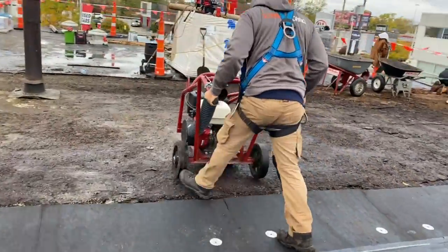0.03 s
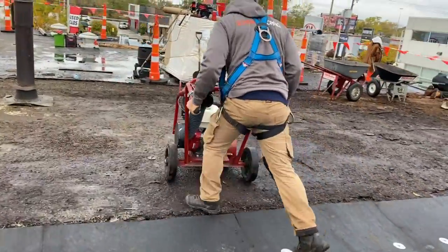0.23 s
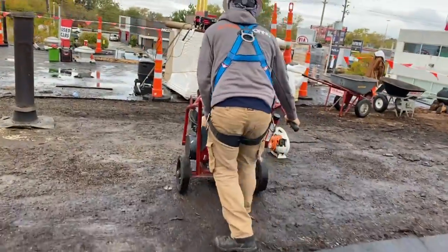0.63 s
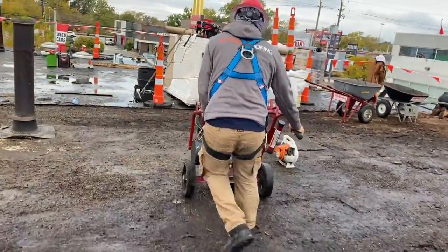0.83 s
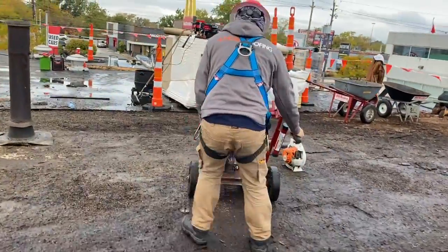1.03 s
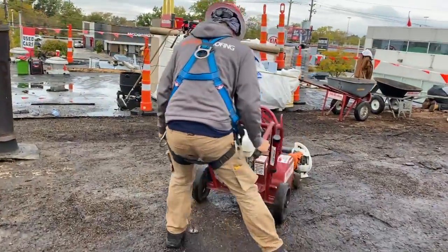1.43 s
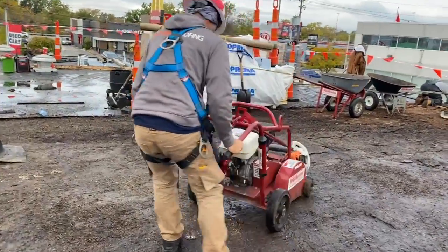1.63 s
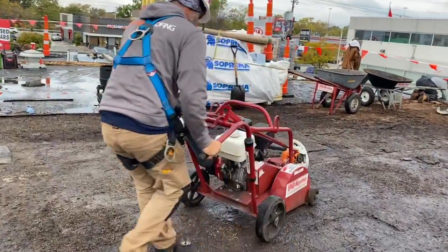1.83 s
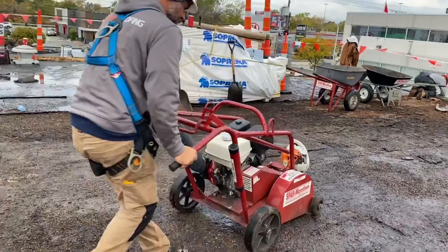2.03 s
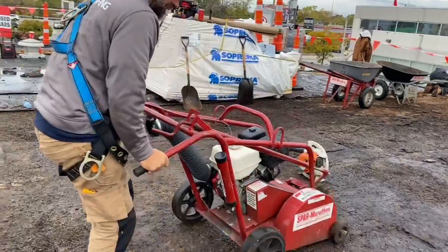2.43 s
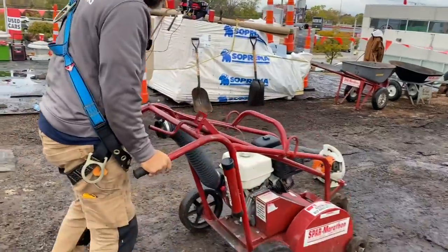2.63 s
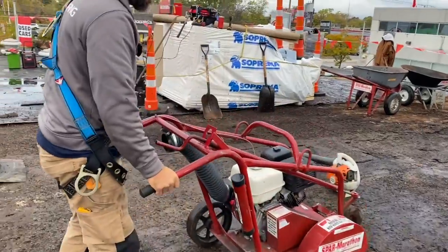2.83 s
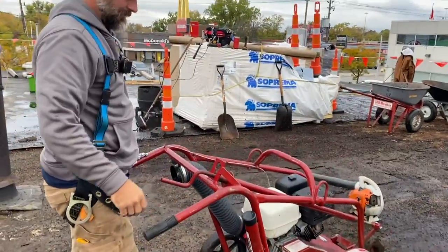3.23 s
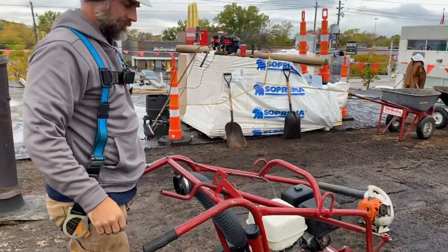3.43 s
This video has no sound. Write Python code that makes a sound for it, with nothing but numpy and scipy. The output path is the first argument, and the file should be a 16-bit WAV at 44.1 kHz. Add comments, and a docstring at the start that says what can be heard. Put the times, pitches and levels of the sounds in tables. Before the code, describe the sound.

A wheeled steel machine rolls over a gritty roof, tyres drumming, stones crunching and loose parts clattering. The knocks grow louder and sharper from about 1 second. Around 2.5 seconds it is set down with a clank and its tube frame rings briefly. Boots scuff at about 2.7 and 3.2 seconds, among dull thumps. Wind rumbles on the close microphone throughout, over a faint distant town.

```python
"""Roof cutter wheeled over grit

A steel roof cutter, engine off, rolls over a gritty roof: stones crunch, the tyres drum through the hood and
loose parts clatter at every bump. It is set down with a clank that leaves the tube frame ringing, and grit
scrapes as it settles. Wind rumbles on the close microphone over a distant town."""
import sys
import numpy as np
from scipy import signal
from scipy.fft import rfft, irfft, next_fast_len
from scipy.io import wavfile
from scipy.ndimage import map_coordinates

SR = 44100
rng = np.random.default_rng(int(sys.argv[2]) if len(sys.argv) > 2 else 0)


def digitize_waveform(pressure):
    """Quantize a signal to 16-bit integers and store it at the path in sys.argv[1].

    Rows of a 2-D input are taken as channels; values are limited to [-1, 1].
    """
    field = np.atleast_2d(pressure).T
    bounded = np.clip(field, -1, 1)
    quanta = np.round(bounded * 32767).astype(np.int16)
    wavfile.write(sys.argv[1], SR, quanta)


N = 154350


def amp(db):
    return 10 ** (np.asarray(db) / 20)

def unit(x):
    return x / np.sqrt(np.mean(x ** 2) + 1e-20)

def along(points, hz):
    """Interpolate (Hz, value) points on a log axis."""
    f, v = np.transpose(points)
    return np.interp(np.log(hz + 1), np.log(f + 1), v)

def around(hz, centre_hz, octaves):
    """Bell-shaped gain on a log axis."""
    return np.exp(-.5 * (np.log2((hz + 1) / centre_hz) / octaves) ** 2)

def curve(rows):
    """One value per sample from (s, value) rows."""
    return np.interp(np.arange(N) / SR, *np.transpose(rows))

def swell(centre_s, sigma_s):
    return np.exp(-.5 * ((np.arange(N) / SR - centre_s) / sigma_s) ** 2)

def wobble(rate):
    """Smooth random curve, rate knots a second."""
    return map_coordinates(rng.standard_normal(int(N * rate / SR) + 4), [np.arange(N) * rate / SR])

def filtered(x, response):
    n = x.shape[-1]
    padded = next_fast_len(n + 8192)
    return irfft(rfft(x, padded) * response(np.fft.rfftfreq(padded, 1 / SR)), padded)[..., :n]

def colour(spectrum):
    return lambda hz: amp(along(spectrum, hz))

def resonances(table):
    """Response of (Hz, width Hz, dB) band-passes of alternating sign."""
    return lambda f: sum((-1) ** k * amp(db) * 1j * f * width / (hz * hz - f * f + 1j * f * width)
                         for k, (hz, width, db) in enumerate(table))

def noise(spectrum):
    """Two independent coloured noises, rms 1: direct and diffuse."""
    return unit(filtered(rng.standard_normal((2, N)), colour(spectrum)))

def impacts(per_s, skew_db, response):
    """Tiny random impacts through a response, rms 1; skew_db makes a few larger (+) or smaller (-)."""
    size = amp(skew_db * np.minimum(rng.exponential(size=N), 5))
    hits = (rng.random(N) < per_s / SR) * size * rng.standard_normal((2, N))
    return unit(filtered(hits, response))

def ring(modes, t, scatter_db):
    """Damped modes, with new strengths and phases at each strike."""
    hz, db, t60 = np.transpose(modes)
    waves = np.exp((2j * np.pi * hz - np.log(1000) / t60)[:, None] * t) * (1 - np.exp(-t / 0.002))
    def strike(share=1):
        gain = share * amp(db + scatter_db * rng.standard_normal((2, len(hz))))
        phase = np.exp(2j * np.pi * rng.random((2, len(hz))))
        return ((gain * phase) @ waves).real
    return strike

def add(out, s, sound):
    i = max(0, round(s * SR))
    out[:, i:i + sound.shape[-1]] += sound[..., :N - i]


# town wash (frequency [Hz], density [dB])
TOWN_SPECTRUM = [(88, -83), (150, -10.5), (189, -9.5), (535, -23.5), (1030, -22.5), (1110, -25),
                 (2360, -30.5), (2650, -37), (4810, -61), (14200, -79), (15000, -70)]
# hiss (time [s], level [dB])
HISS_LEVEL = [(0, -62), (.3, -55.5), (2.8, -55.5), (3.06, -52), (3.16, -65.5), (3.32, -64.5), (3.5, -57)]
# hiss (frequency [Hz], density [dB])
HISS_SPECTRUM = [(1500, -17), (3500, -4.5), (4500, 3), (5500, -7), (6600, -6), (8000, -12), (11500, -8.5),
                 (16000, -15)]

def town():
    """Steady wash of a distant town, with a thin hiss."""
    return amp(-43.5) * noise(TOWN_SPECTRUM) + amp(curve(HISS_LEVEL)) * noise(HISS_SPECTRUM)


# gusts (time [s], level [dB])
WIND_LEVEL = [(0, -28.5), (.08, -39.5), (.2, -29), (.45, -33), (.7, -33.5), (1, -23.5), (1.2, -31),
              (1.45, -26.5), (1.8, -32.5), (1.95, -26.5), (2.15, -35.5), (2.35, -24.5), (2.57, -26),
              (2.73, -43), (2.82, -23.5), (2.95, -22.5), (3.15, -23), (3.38, -30.5), (3.46, -36)]
# rumble (frequency [Hz], density [dB])
WIND_SPECTRUM = [(20, -28), (35, -16.5), (50, -3), (66, -1), (100, -4), (150, -11.5), (250, -18.5),
                 (400, -35.5), (800, -38), (3000, -90)]

def wind(buffet_db=2.2, buffets_per_s=24):
    """Gusts buffet the microphone."""
    return amp(curve(WIND_LEVEL) + buffet_db * wobble(buffets_per_s)) * noise(WIND_SPECTRUM)


# dull bumps (time [s], level [dB], pitch [Hz])
THUMPS = [(.108, -18, 110), (1.058, -10, 85), (1.356, -12, 62), (2.322, -18, 150), (2.341, -14, 130),
          (2.806, -17, 110), (2.885, -15, 70), (2.936, -17, 125), (3.146, -9.5, 135), (3.472, -29, 140)]

def thumps(t60_s=.11, slap_db=1, highpass_hz=43.7):
    """Bumps close to the microphone: a few low cycles under a soft slap."""
    out, t = np.zeros((2, N)), np.arange(SR // 4) / SR
    attack = 1 - np.exp(-(t / 0.0025) ** 2)
    for s, db, hz in THUMPS:
        boom = np.sin(2 * np.pi * hz * t) * np.exp(-np.log(1000) * t / t60_s)
        slap = np.sin(2 * np.pi * 2.18 * hz * t) * np.exp(-t / 0.0058)
        add(out[:1], s, amp(db) * (boom + amp(slap_db) * slap) * attack)  # direct part only
    return filtered(out, lambda f: (1j * f / (highpass_hz + 1j * f)) ** 2)


# grit scrapes (centre [s], sigma [s], level [dB])
SCUFFS = [(2.753, 0.097, -41), (3.226, 0.017, -44)]
# scraped grit (frequency [Hz], density [dB])
SCUFF_SPECTRUM = [(300, -21), (900, 9), (1400, 7), (2400, -11), (3300, -7), (8000, -27), (16000, -30)]

def scrapes():
    """Grit scrapes in short swells: a long one as the machine settles, a brief one later."""
    scrape = impacts(per_s=3100, skew_db=1, response=colour(SCUFF_SPECTRUM))
    return scrape * sum(amp(db) * swell(s, sigma_s) for s, sigma_s, db in SCUFFS)


# breaking stones (time [s], level [dB], centre [Hz])
STONE_CRACKS = [(0.6576, -33, 4840), (1.0335, -38, 4500), (1.4414, -34, 5500), (1.7863, -29, 5000),
                (2.002, -23.5, 5900), (2.131, -40, 12100), (2.1784, -25, 5400), (2.3047, -44, 12000),
                (2.4365, -28, 4800), (2.462, -28, 4440), (2.494, -25, 4300)]

def cracks(width_octaves=0.4, decay_s=0.0035):
    """Larger stones break under a wheel with a dry click."""
    out, t = np.zeros((2, N)), np.arange(SR // 20) / SR
    for s, db, hz in STONE_CRACKS:
        burst = unit(filtered(rng.standard_normal((2, len(t))), lambda f: around(f, hz, width_octaves)))
        add(out, s, amp(db) * burst * np.exp(-t / decay_s))
    return out


# grit under the tyres (time [s], relative level [dB])
GRIT_LEVEL = [(0.0, -48), (0.1, -48.5), (0.22, -37), (0.58, -43), (0.78, -37), (1.2, -36), (1.43, -38.5),
              (1.64, -37.5), (2.08, -31.5), (2.23, -37.5), (2.46, -40.5), (2.6, -31.5), (2.87, -47.5),
              (2.95, -61)]
# fine grains (frequency [Hz], density [dB])
CRUNCH_SPECTRUM = [(200, -47), (500, 9.5), (1000, 9), (2000, 2), (4000, -8.5), (8000, -20.5),
                   (12000, -43.5), (16000, -64)]
# small stones (frequency [Hz], density [dB])
SNAP_SPECTRUM = [(500, -33), (1500, 6), (4000, -1.5), (8000, 1.5), (12000, -7), (16000, -21)]

def grit(snaps_per_s=40, snap_db=-12.5, snap_spread_db=12, snap_decay_s=0.004):
    """Fine grains crunch under the tyres; small stones snap in broad bursts."""
    crunch = impacts(per_s=1700, skew_db=-1.5, response=colour(CRUNCH_SPECTRUM))
    hits = (rng.random(N) < snaps_per_s / SR) * amp(snap_spread_db * rng.random(N))
    bursts = signal.lfilter([1], [1, -np.exp(-1 / (snap_decay_s * SR))], hits)
    snaps = unit(bursts * noise(SNAP_SPECTRUM))
    level_db = curve(GRIT_LEVEL) - 1 + 2.2 * wobble(30.15)
    return amp(level_db) * (crunch + amp(snap_db) * snaps)


def drumming(modes, waver_db=2.3, wander_widths=0.7):
    """Resonances kept ringing by the wheels, each wavering in level and pitch."""
    out = np.zeros((2, N))
    for hz, width, db in modes:
        drift = np.sqrt(2 * np.pi * wander_widths * width / SR) * rng.standard_normal((2, N))
        phase = np.cumsum(2 * np.pi * hz / SR + drift, axis=1)
        out += amp(db + waver_db * wobble(2 * width)) * np.sin(phase)
    return unit(out)


# relative rolling levels (time [s], chassis [dB], tyres [dB], hood [dB])
ROLL_LEVELS = [(0.0, -39, -26, -23), (0.075, -41, -48, -41), (0.12, -31, -20.5, -30), (0.15, -56, -35, -32),
               (0.21, -36, -28.5, -24.5), (0.44, -28, -36.5, -36), (0.57, -38.5, -31.5, -30.5),
               (0.59, -30.5, -23, -26), (0.82, -27, -32.5, -39), (0.89, -42.5, -39, -36.5),
               (1.08, -26, -18.5, -17), (1.125, -21, -23, -22.5), (1.165, -22, -15, -20),
               (1.26, -26, -38.5, -33.5), (1.34, -43, -33.5, -39.5), (1.41, -31, -33, -32),
               (1.49, -30, -19, -27), (1.55, -24, -28.5, -20), (1.66, -19, -23, -32.5),
               (1.75, -33.5, -31, -25), (1.85, -32, -22, -33), (1.93, -36, -34, -41.5),
               (2.03, -22, -16.5, -25.5), (2.12, -29.5, -30.5, -35), (2.22, -22.5, -18, -27),
               (2.29, -39, -41, -39), (2.34, -23, -26, -34), (2.39, -46, -34, -42), (2.43, -33, -28, -29),
               (2.86, -39, -39.5, -52), (2.9, -42.5, -48, -51)]
# resonances driven by rolling (frequency [Hz], width [Hz], gain [dB])
CHASSIS_MODES = [(172.9, 8.6, 0)]
TYRE_MODES = [(239, 12, 0), (252, 14, -5), (288, 20, -7), (312, 20, -10)]
HOOD_DRONE_MODES = [(378, 14.4, -6), (469, 18.7, 1.5), (509.5, 21, -2.5), (592, 24.3, -3.5),
                    (808, 13, -11.5)]

def rolling(chassis_db=1, tyre_db=0.5, hood_db=-2):
    """Stones under the wheels drum through chassis, tyres and hood, fading with the grit at the end."""
    chassis, tyre, hood = (curve(np.array(ROLL_LEVELS)[:, [0, column]]) for column in (1, 2, 3))
    boom = amp(chassis + chassis_db) * drumming(CHASSIS_MODES)
    drum = amp(tyre + tyre_db) * drumming(TYRE_MODES)
    drone = amp(hood + hood_db) * impacts(per_s=300, skew_db=0.5, response=resonances(HOOD_DRONE_MODES))
    fade = curve([(2.75, 0.86), (2.95, 0.22)])
    return fade * (boom + drum + drone + grit())


# frame resonances (frequency [Hz], width [Hz], gain [dB])
CREAK_MODES = [(1118, 32, 5), (1425, 42, 6.5), (1630, 33, 5), (2160, 105, 1), (2560, 170, -7.5)]

def creak():
    """Quick slips in a joint drive the frame as it settles."""
    slips = impacts(per_s=1300, skew_db=2.0, response=resonances(CREAK_MODES))
    return amp(-24) * swell(centre_s=2.741, sigma_s=0.011) * slips


# tube frame (frequency [Hz], gain [dB], t60 [s])
TUBE_MODES = [(463, -1, .4), (590, -1, .85), (802, 3.5, .45), (903, 1.5, .55), (955, -4, .4),
              (1098, -6, .6), (1128, -1, .85), (1273, -1, .45), (1416, -4, .7), (1470, -3, .6),
              (1561, -7, .85), (1653, -5, 1), (1846, -12, .85), (2008, -5, .5), (2135, -5, .5),
              (2654, -4, .35), (2869, -8, .4)]
# touch, land, settle (time [s], level [dB])
LANDINGS = [(2.418, -34), (2.558, -28.5), (2.71, -41)]

def landing():
    """The tube frame rings on after the machine is set down."""
    out, strike = np.zeros((2, N)), ring(TUBE_MODES, np.arange(SR) / SR, scatter_db=4)
    for s, db in LANDINGS:
        add(out, s, amp(db) * strike())
    return out


# sheet steel of the hood (frequency [Hz], gain [dB], t60 [s])
HOOD_MODES = [(800, -5, .25), (907, -5, .25), (1127, -6, .25), (1190, -7, .25), (1303, -6, .2),
              (1484, -3, .24), (1553, -10, .2), (1813, -10, .2), (2010, -6, .22), (2060, 1, .22),
              (2143, -4, .18), (2304, -7, .2), (2607, -5, .14), (2807, -2, .16), (2945, -6, .14),
              (3085, -7, .14), (3255, -3, .12), (3373, -5, .16), (3921, -6, .11), (4690, -11, .1),
              (5420, -8, .09), (6400, -11, .09)]
# hard knocks (time [s], level [dB], centre [Hz])
CLANGS = [(1.066, -18.5, 3140), (1.072, -19.5, 2080), (1.521, -17, 2750), (1.748, -21.5, 2060),
          (1.814, -31, 2050), (1.815, -20.5, 1450), (1.893, -30.5, 2050), (1.96, -25.5, 2030),
          (2.416, -20, 2230), (2.496, -28.5, 2120)]

def clangs(width_octaves=0.11):
    """Where a hard knock lands decides which modes of the hood sing out."""
    out, strike = np.zeros((2, N)), ring(HOOD_MODES, np.arange(SR // 2) / SR, scatter_db=2)
    mode_hz = np.array(HOOD_MODES)[:, 0]
    for s, db, hz in CLANGS:
        add(out, s, amp(db) * strike(around(mode_hz, hz, width_octaves)))
    return out


# loose steel (frequency [Hz], density [dB])
STEEL_SPECTRUM = [(100, -26), (170, -2), (260, 4), (400, 2), (600, 5), (1100, 5.5), (1700, 2), (2200, 2),
                  (3500, 2), (5500, -0.5), (8000, -5), (12000, -12), (16000, -25)]

def steel_bands(centres_hz, spacing_hz=20, depth_db=3.2):
    """Noise with the crowded peaks and dips of loose steel, split into bands."""
    smooth = noise(STEEL_SPECTRUM)
    peaks_db = depth_db * np.clip(rng.standard_normal(4096), -2, 2)
    peaks_hz = spacing_hz * np.arange(len(peaks_db))
    steel = unit(filtered(smooth, lambda hz: amp(np.interp(hz, peaks_hz, peaks_db))))
    return np.array([filtered(steel, lambda hz: np.interp(np.log(hz + 1), np.log(centres_hz), band))
                     for band in np.eye(len(centres_hz))])


# bumps (time [s], strength [dB], bass offset [dB], treble offset [dB])
KNOCKS = [(0.0874, -18, 12, -32), (0.153, -23, 6, -25), (0.192, -18, 12.5, -9), (0.2354, -17, 3, -44),
          (0.358, -27, 13, -9.5), (0.5, -32.5, 21, -33), (0.5716, -18.5, 8.5, -11),
          (0.5854, -15.5, 8.5, -20), (0.6595, -19, 9.5, -5.5), (0.7054, -21, 13, -13),
          (0.7727, -22.5, 14.5, -14), (0.929, -23.5, 15.5, -20), (0.9896, -17.5, 2, -18),
          (1.0211, -18.5, 10, -7.5), (1.061, -7.5, -1, -9), (1.0774, -21, -4, -28), (1.1404, -9, -22, -11),
          (1.1617, -16.5, 15, -9), (1.2835, -21.5, 7, -34), (1.3886, -16.5, -13, -22),
          (1.4318, -20, 11.5, -15.5), (1.4612, -16.5, 12, -12.5), (1.5182, -4.5, -12, -9.5),
          (1.546, -17, 17, -7), (1.6364, -10.5, 0, -9.5), (1.6594, -10, 6.5, -16.5), (1.7465, -9.5, 3, -7),
          (1.8133, -8.5, 1.5, -16.5), (1.8922, -21, -18, -12.5), (1.9589, -13, 4, -9.5),
          (2.0017, -15.5, -3, -10.5), (2.046, -21, 15.5, -9), (2.0963, -12.5, -4, -14.5),
          (2.1297, -23.5, 13, -5.5), (2.1613, -10, -4, -14.5), (2.1767, -12, 1, -16.5),
          (2.2044, -20, 14, -19), (2.3356, -29.5, -9, -6), (2.4144, -13, -7, -7), (2.4374, -10, 3, -32),
          (2.4972, -18, 10, -20.5), (2.5495, -22, 20, 8), (2.5536, -7.5, 2, -8), (2.558, -12, -7, -4),
          (2.7028, -18, -1, -21), (2.8865, -30.5, 1, -0.5)]
# ring of loose parts before set-down (frequency [Hz], t60 [s])
STEEL_T60 = [(150, 0.65), (500, 0.2), (1200, 0.49), (2500, 0.19), (5000, 0.21), (12000, 0.14)]
# first contact (frequency [Hz], level over the ring [dB])
CONTACT_SPECTRUM = [(500, -20), (1200, -14), (2500, -0.5), (5000, 7.5), (12000, -1.5)]

def clatter(steel_db=-5.5, hood_db=-24, contact_t60_s=0.068, grounded_s=2.54):
    """Each bump cracks, then rings loose parts and hood; the bass builds and dies more slowly."""
    out, t = np.zeros((2, N)), np.arange(SR // 2) / SR
    centres_hz = np.geomspace(125, 16000, 8)
    bands = steel_bands(centres_hz)
    bass = along([(600, 1), (1600, 0.016)], centres_hz)
    treble = along([(2500, 0.12), (6500, 1.0)], centres_hz)
    rise_s = 0.00029 + 0.0053 * bass
    attack = 1 - np.exp(-t / rise_s[:, None])
    decay = np.exp(-np.log(1000) * t / along(STEEL_T60, centres_hz)[:, None])
    contact = amp(along(CONTACT_SPECTRUM, centres_hz))[:, None] * np.exp(-np.log(1000) * t / contact_t60_s)
    power, strike_hood = np.zeros((len(centres_hz), N)), ring(HOOD_MODES, t, scatter_db=4)
    for s, db, bass_db, treble_db in KNOCKS:
        damping = 1.18 if s > grounded_s else 1  # faster decay with the weight on the roof
        envelope = attack * np.hypot(decay ** damping, contact)
        gain = amp(db + bass_db * bass + treble_db * treble)
        add(power, s, (gain[:, None] * envelope) ** 2)
        add(out, s, amp(db + hood_db) * strike_hood())
    return out + amp(steel_db) * np.einsum('bcn,bn->cn', bands, np.sqrt(power))


# left-right likeness (frequency [Hz], correlation [ratio])
CORRELATION = [(50, 0.8), (250, 0.95), (1500, 0.93), (4000, 0.86), (5600, 0.25), (7000, 0.94), (15000, 1)]

def scene():
    """All sources are nearly central; a small diffuse part sets the sides apart."""
    def spread(hz):
        angle = np.arccos(np.clip(along(CORRELATION, hz), -1, 1)) / 2
        return np.array([np.cos(angle), np.sin(angle)])
    cutter = clatter() + clangs() + landing() + creak() + rolling() + cracks()
    mid, side = filtered(cutter + scrapes() + thumps() + wind() + town(), spread)
    return np.array([mid + side, mid - side])


# stereo treble phase twist (frequency [Hz], left behind right [turns])
TREBLE_TWIST = [(0, 0), (7300, 0), (8000, .17), (8600, .48), (9500, .52), (10500, 1), (11800, 1),
                (12800, 1.47), (13800, 1.53), (14700, 2)]
# balance (frequency [Hz], left over right [dB])
BALANCE = [(60, 0.7), (150, 0.4), (600, 2.5), (1300, -0.4), (3200, 2.5), (5000, 1.3), (15000, -0.5)]

def record(dry):
    """Balance and band limit; left and right turn opposite near 9 and 13 kHz, widening the highs."""
    def response(hz, top_hz=15850):
        twist = np.exp(-2j * np.pi * np.interp(hz, *np.transpose(TREBLE_TWIST)))
        lean = amp(along(BALANCE, hz) / 2)
        return np.array([twist * lean, 1 / lean]) * (hz < top_hz)
    return filtered(dry, response)


dry = scene()
out = record(dry)
digitize_waveform(out)
```